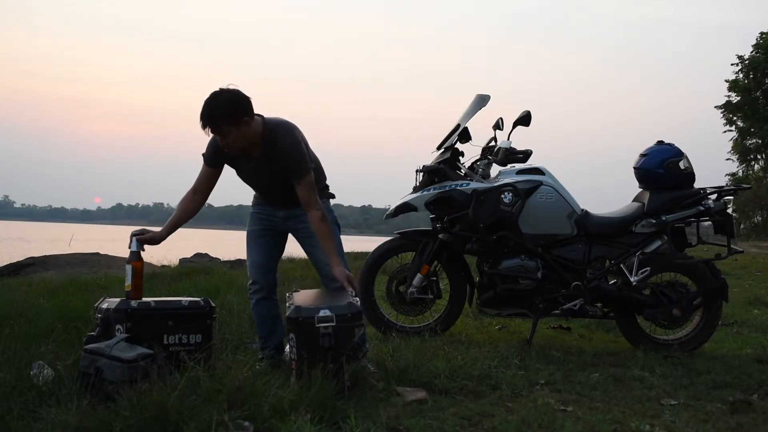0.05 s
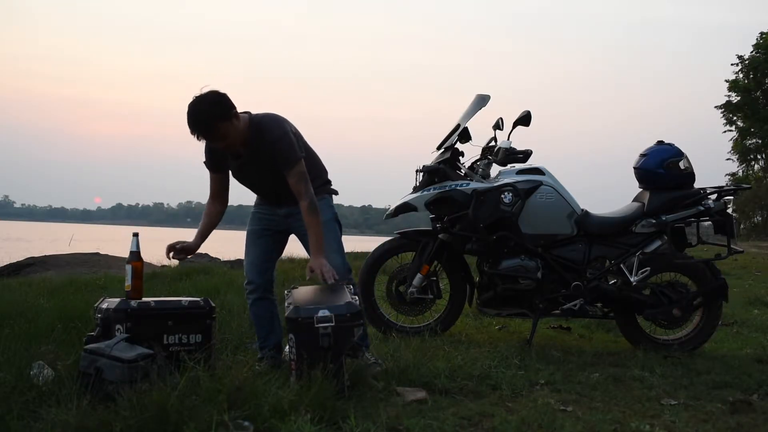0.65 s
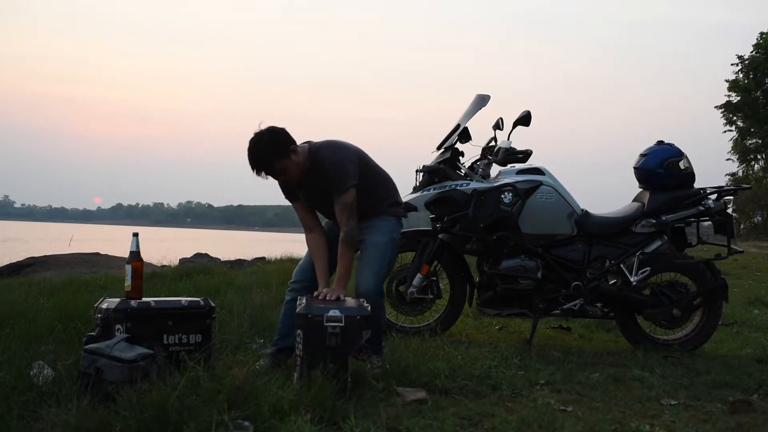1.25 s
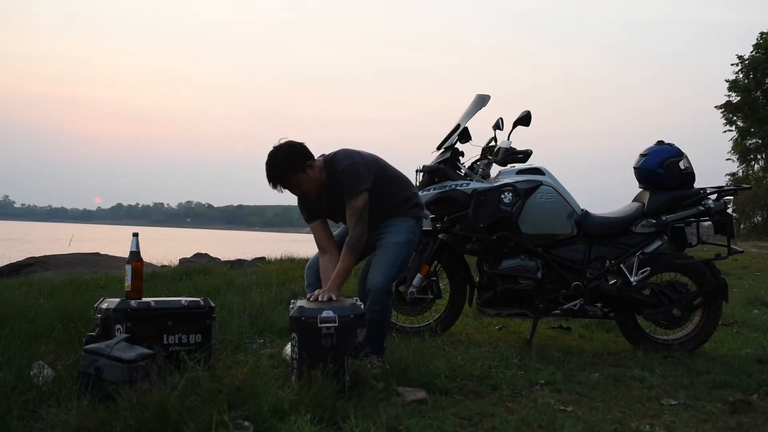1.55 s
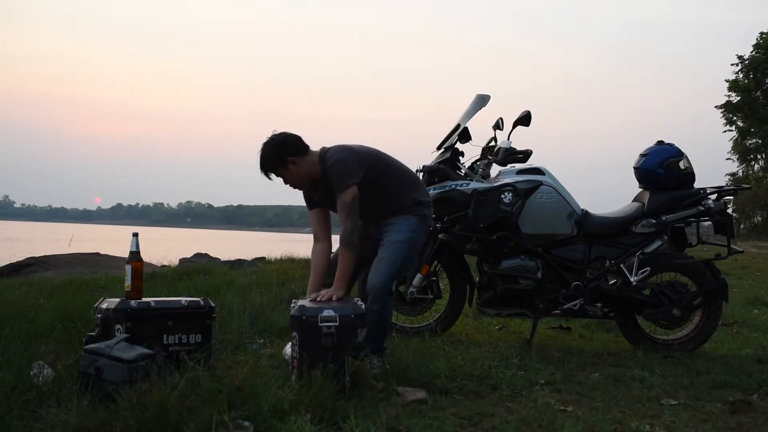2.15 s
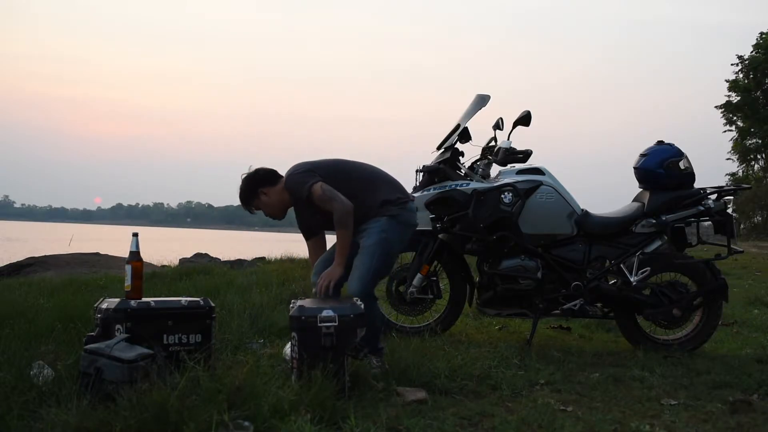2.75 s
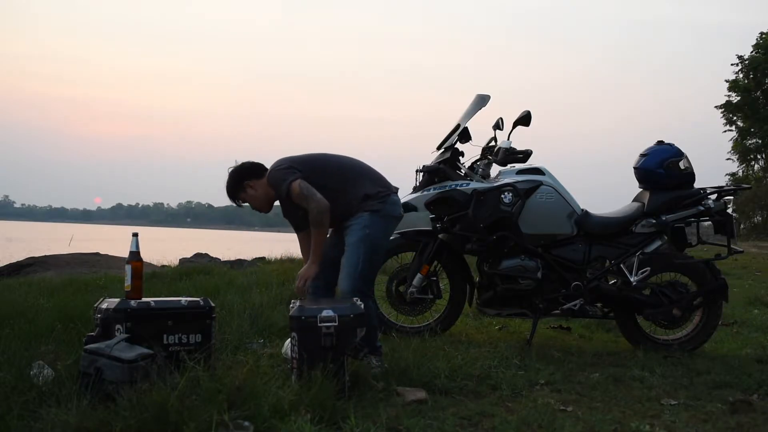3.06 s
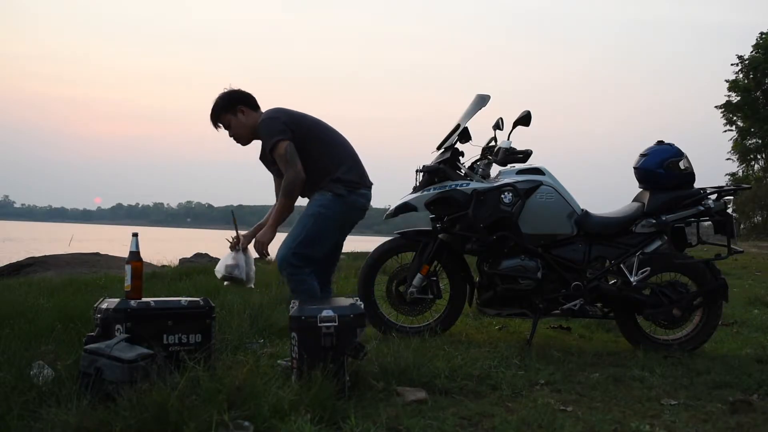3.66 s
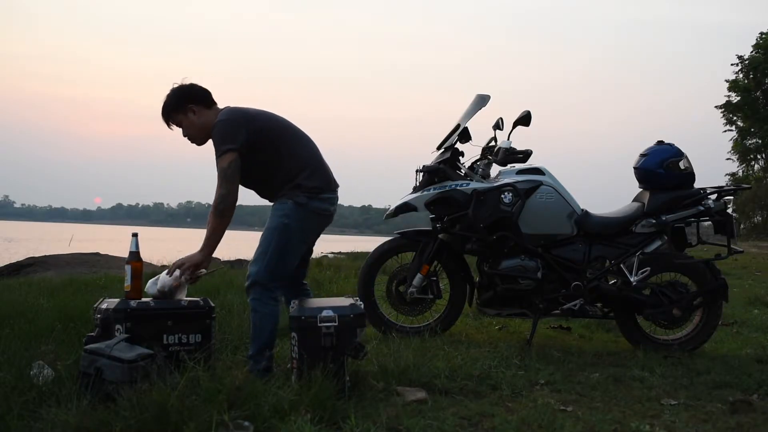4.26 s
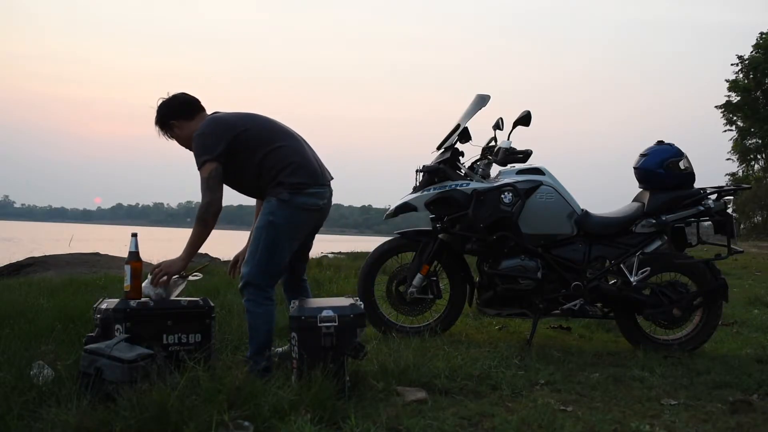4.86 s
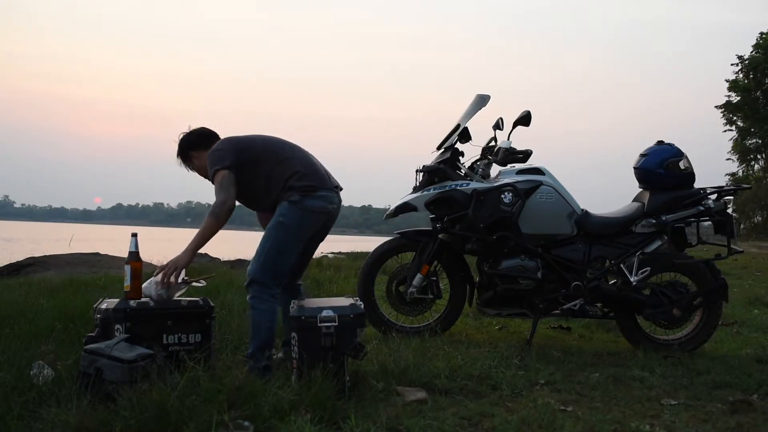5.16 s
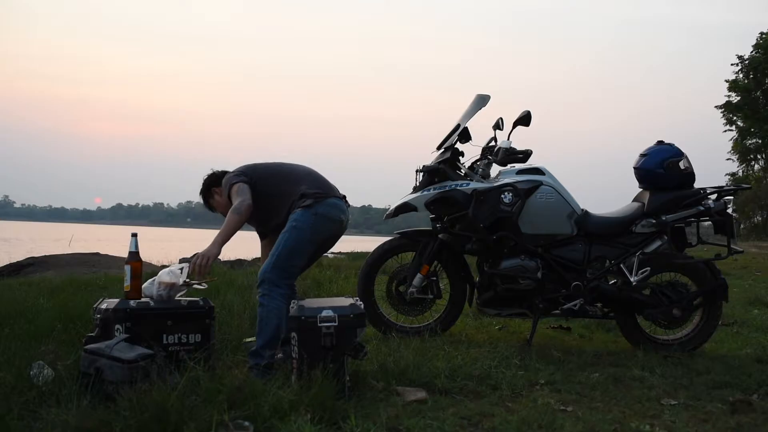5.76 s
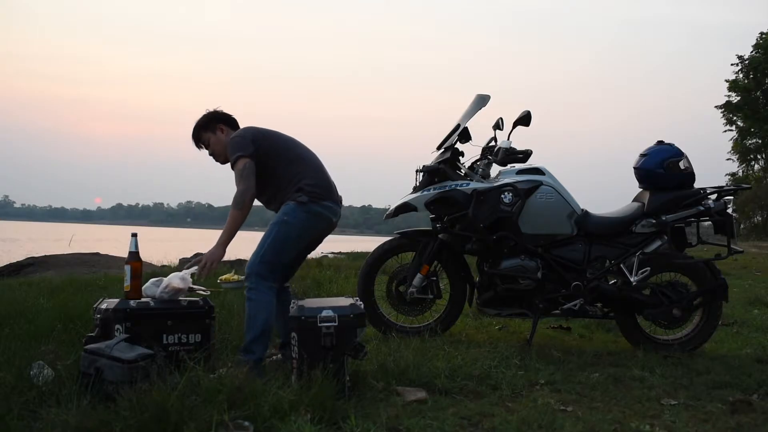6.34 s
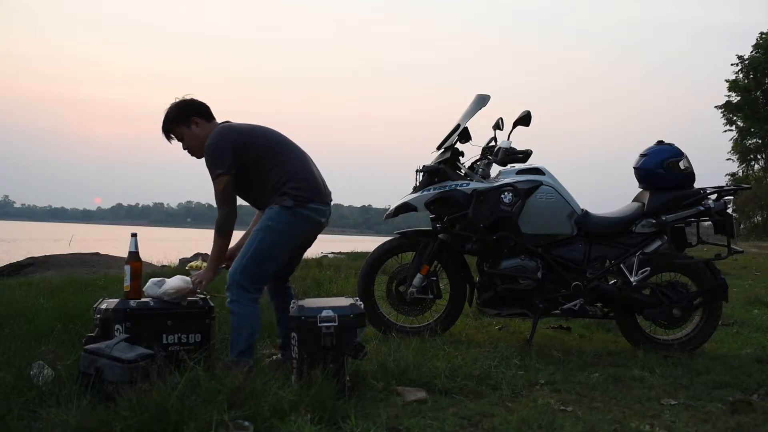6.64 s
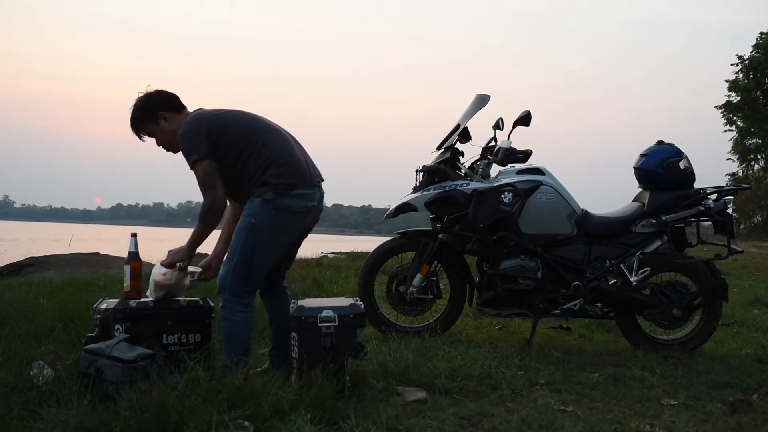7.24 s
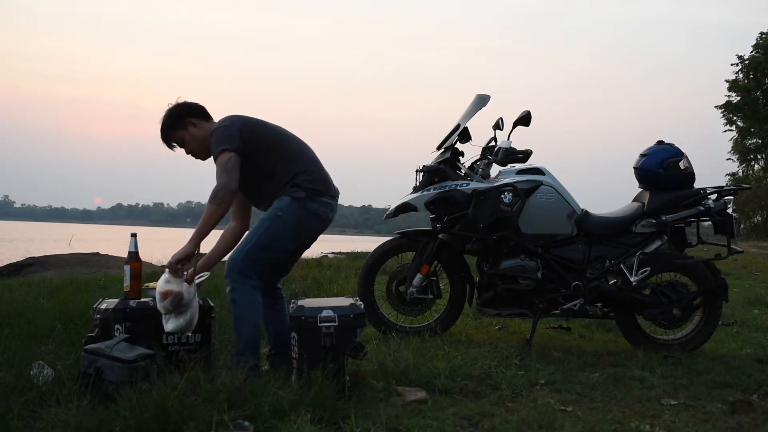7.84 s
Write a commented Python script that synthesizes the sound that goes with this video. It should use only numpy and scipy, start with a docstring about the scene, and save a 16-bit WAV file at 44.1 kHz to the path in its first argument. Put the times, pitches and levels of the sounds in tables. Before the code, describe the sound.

A steady, high buzz of crickets and an insect chorus fills a quiet outdoor place, with birds chirping throughout. In the foreground, a glass bottle knocks lightly on an aluminium case right at the start. At about 1 and 1.6 seconds come the loudest sounds, two sharp, hollow thuds of a metal case, followed by smaller knocks and clinks until 2 seconds. Feet thump softly on grass through the first six seconds. A faint, hoarse rooster crows far off from 2 to 3.5 seconds. A plastic bag rustles near 3 seconds and crinkles from 4 to 5. Bird whistles grow clearer between 4.8 and 6.3 seconds, with a quick cluster of dry taps at 5.6. The bag crinkles again from 6.5 seconds, with light bumps. A case knocks at 7.4 seconds, and metal utensils clink brightly just before 8 seconds.

```python
"""Cases and a food bag by an evening lake

A glass bottle is stood on an aluminium case and a second case is pressed into the grass: lids ring and
boxes boom. A plastic bag of food is lifted and moved, crinkling, its utensils clinking, while feet thump
softly on turf. Two bush-crickets buzz with rapid wing strokes in front of an insect chorus, birds
whistle through the trees and a hoarse rooster crows far off."""
import sys
import numpy as np
from scipy import signal
from scipy.fft import rfft, irfft, next_fast_len
from scipy.io import wavfile
from scipy.ndimage import map_coordinates

SR = 44100
rng = np.random.default_rng(int(sys.argv[2]) if len(sys.argv) > 2 else 0)


def master(y):
    """Save y as 16-bit WAV."""
    cut = np.clip(np.atleast_2d(y).T, -1, 1)
    pcm = np.round(cut * 32767)  # scale
    wavfile.write(sys.argv[1], SR, pcm.astype(np.int16))


N = 357210

# how heavily the feet shift about: (time [s], level [dB])
FOOT_WEIGHT = [(0, -42), (0.3, -53.5), (1.1, -46), (1.4, -51.5), (1.8, -38), (2.0, -48), (2.9, -50),
               (3.25, -43), (3.6, -50.5), (4.4, -57), (5.5, -53), (5.9, -57.5), (8.1, -62)]
# reverb of the trees: (frequency [Hz], t60 [s])
TREE_DECAY = [(200, 0.64), (2500, 0.86), (10000, 0.056)]


def amp(db):
    """Decibels to gain."""
    return 10 ** (np.asarray(db) / 20)


def unit(x):
    """Scaled to rms 1."""
    return x / np.sqrt(np.mean(x ** 2) + 1e-20)


def along(points, hz):
    """(frequency [Hz], value) points read on a log axis."""
    f, v = np.transpose(points)
    return np.interp(np.log(hz + 1), np.log(f + 1), v)


def curves(rows):
    """An automation curve for each column after the time."""
    s, *cols = np.transpose(rows)
    return [np.interp(np.arange(N) / SR, s, c) for c in cols]


def wobble(rate):
    """A smooth random curve, rate knots a second."""
    knots = rng.standard_normal(int(N * rate / SR) + 4)
    return map_coordinates(knots, [np.arange(N) * rate / SR])


def add(track, s, sound):
    """Mix a sound into a stereo track at time s."""
    start = max(round(s * SR), 0)
    track[:, start:start + sound.shape[-1]] += sound[..., :N - start]


def noise(spectrum, alike=None, size=N):
    """Stereo noise of rms 1, coloured by (frequency [Hz], level [dB]) points; wider in the treble."""
    # default stereo image: (frequency [Hz], left-right likeness [0-1])
    usual_alike = [(4000, 1), (8000, 0.58), (13000, 0.55)]
    hz = np.fft.rfftfreq(size, 1 / SR)
    width = np.arccos(np.clip(along(alike or usual_alike, hz), -1, 1)) / 2
    coloured = rfft(rng.standard_normal((2, size))) * amp(along(spectrum, hz))
    mid, side = irfft(coloured * [np.cos(width), np.sin(width)], size)
    return unit(np.array([mid + side, mid - side]))


def place(x, left_db, lead_ms):
    """Pan: the left side leads, and is left_db louder at 10 kHz as the right's treble is shaded."""
    side, size = np.array([[.5], [-.5]]), x.shape[-1]
    hz = np.fft.rfftfreq(size, 1 / SR)
    arrival = np.exp(2j * np.pi * hz * side * lead_ms / 1000)
    shade = amp(side * left_db * hz / 10000)
    return irfft(rfft(x) * arrival * shade, size)


def ring(modes, t, detune=.006):
    """Decaying modes, one a row; every blow shares its force among them anew."""
    hz, db, t60 = np.transpose(modes)[:, :, None]
    gain = amp(db + 1.5 * rng.standard_normal(hz.shape))
    gain /= np.sqrt(np.sum(gain ** 2) / 2)
    sign = (-1) ** np.arange(len(hz))[:, None]
    hz = hz * (1 + detune * rng.standard_normal(hz.shape))
    return sign * gain * amp(-60 * t / t60) * np.sin(2 * np.pi * hz * t)


def evening_air():
    """The bed: a swelling haze of distant birds over the open air."""
    # colour of the air: (frequency [Hz], level [dB])
    air_colour = [(120, -39), (200, -0.5), (475, -19.5), (614, -6), (954, -10.5), (1180, -13.5),
                  (1890, -21), (2560, -1), (3360, -11), (3790, -15), (4620, 0.5), (5210, -16.5),
                  (5710, 3.5), (7500, -4), (9750, -54), (16500, -120)]
    haze_colour = [(1000, -60), (1500, -17), (2300, 0), (2800, -7.5), (3400, 5.5), (4200, -28),
                   (6000, -60)]
    haze = amp(-60 + 1.8 * wobble(7)) * noise(haze_colour)
    air = amp(-53.7 + 0.9 * wobble(4.16)) * noise(air_colour)
    return haze + air


def buzz(rate_hz, start_hz, end_hz, stroke_s, scatter, unsteady):
    """Each wing stroke is a falling chirp, at a slightly unsteady rate; grass adds a short tail."""
    t = np.arange(SR // 40) / SR
    u = np.minimum(t / stroke_s, 1)
    chirp = np.sin(np.pi * u) ** 2 * np.sin(2 * np.pi * t * (start_hz + (end_hz - start_hz) * u / 2))
    beats = np.floor(np.cumsum(rate_hz * (1 + unsteady * wobble(70))) / SR)
    strokes = np.diff(beats, prepend=0) * amp(wobble(60))
    grass = scatter * rng.standard_normal((2, len(t))) / np.sqrt(len(t))
    grass[:, 0] = 1  # the direct path
    voice = signal.fftconvolve(chirp[None], grass, axes=1)
    return unit(signal.fftconvolve(strokes[None], voice, axes=1)[:, :N])


def insects():
    """Two near bush-crickets in front of a blurred chorus and a broad background hiss."""
    # the crickets' faders: (time [s], low singer [dB], high singer [dB])
    cricket_levels = [(0, -51.5, -49.5), (0.7, -49, -48.5), (2, -51, -49.5), (3.1, -51.5, -48.5),
                      (3.9, -54, -51), (4.5, -72.5, -48), (5.4, -56.5, -51), (6.2, -64, -51),
                      (7.2, -71, -52), (7.5, -76, -54), (8.1, -72, -54)]
    # insect chorus over a broad, even background hiss: (frequency [Hz], level [dB])
    chorus_and_hiss = [(4000, -10), (5000, -3.5), (5700, 0), (6400, -19), (7400, -18), (8200, -2.5),
                       (9000, 9), (9500, 5), (10200, -6), (11200, -36), (12000, -10), (13000, -42),
                       (16000, -58)]
    # stereo image of that bed: (frequency [Hz], left-right likeness [0-1])
    bed_alike = [(6000, 1), (9000, 0.65), (12000, 0.25)]
    low_db, high_db = curves(cricket_levels)
    low = buzz(rate_hz=107.2, start_hz=9160, end_hz=8080, stroke_s=.0041, scatter=.056, unsteady=.0023)
    high = buzz(rate_hz=131.2, start_hz=12350, end_hz=9400, stroke_s=.0069, scatter=.8, unsteady=.0076)
    bed = amp(-47 + 0.44 * wobble(3.3)) * noise(chorus_and_hiss, alike=bed_alike)
    ahead = place(amp(low_db + 3.5) * low + bed, left_db=1, lead_ms=0)
    return ahead + place(amp(high_db - 1) * high, left_db=7, lead_ms=.075)


def shuffles(count):
    """Small random shifts of weight, heavier while the feet are busy, as footfall rows."""
    when, pitch, size = rng.random((count, 3)).T
    s = when * N / SR
    db = np.interp(s, *np.transpose(FOOT_WEIGHT)) + 12 + 2 * size
    hz = 121 * 2 ** (pitch - .5)
    return list(zip(s, db, hz))


def steps():
    """Turf takes each footfall as a dull push of a cycle or two, over an uneven low rumble."""
    # firm footfalls: (time [s], level [dB], pitch [Hz])
    footfalls = [(0.592, -34.5, 81), (0.652, -34.5, 78), (0.695, -31.5, 146), (0.83, -37.5, 90),
                 (0.903, -27.5, 107), (1.159, -34, 115), (1.207, -37, 94.5), (1.275, -33.5, 107),
                 (2.463, -32, 89), (3.046, -33, 87), (3.272, -29.5, 182), (3.296, -32.5, 101),
                 (3.359, -33, 75), (3.858, -34.5, 82), (4.198, -37.5, 75), (4.731, -39.5, 88.5),
                 (4.783, -36, 106), (5.544, -31, 117), (5.689, -37.5, 86), (5.759, -40, 125)]
    # colour of the ground rumble: (frequency [Hz], level [dB])
    rumble_colour = [(12, -45), (20, -4), (86, -1.5), (135, -5.5), (252, -23), (284, -17.5), (362, -20.5),
                     (500, -23), (650, -18), (1100, -120)]
    scuff_colour = [(15, -38), (40, -14), (90, -2.5), (220, -6), (500, -41), (3000, -37)]
    out, t = np.zeros((2, N)), np.arange(SR // 4) / SR
    for s, db, hz in footfalls + shuffles(count=26):
        half_cycles = 2 * t * hz
        push = half_cycles * np.exp(1 - half_cycles) * np.sin(2 * np.pi * hz * t)
        scuff = amp(-6.5 - 60 * t / 0.17) * noise(scuff_colour, size=len(t))
        add(out, s, amp(db - 1) * (push + scuff * (1 - np.exp(-t / 0.0065))))
    ground_db, = curves(FOOT_WEIGHT)
    return out + amp(ground_db - 2.5 + 1.8 * wobble(14)) * noise(rumble_colour)


def handling():
    """Rustle and crinkle envelopes: each stroke swells, holds and fades above the held bag's stir."""
    # light rustle of the bag as it hangs or is held: (time [s], level [dB])
    held = [(0, -69), (2.6, -67.5), (3.5, -63.5), (4.3, -59.5), (5.0, -60.5), (5.35, -65.5), (5.95, -67),
            (6.45, -57.5), (7.05, -58), (7.45, -59.5), (8.1, -73)]
    # hands over grass, cloth and plastic:
    # (time [s], hold [s], rustle [dB], relative crinkle [dB], swell [s], fade [s])
    rubs = [(1.37, 0.1, -57, -11, 0.058, 0.04), (2.79, .04, -56, 1.5, .03, 0.043),
            (2.896, 0.027, -48.5, -0.5, 0.054, 0.11), (3.139, 0.028, -57.5, 7, 0.11, 0.0078),
            (4.12, 0.016, -47, 2, 0.022, 0.072), (4.46, 0.13, -56.5, 7.5, 0.044, 0.095),
            (4.785, 0.073, -54.5, 6, 0.062, 0.025), (4.906, 0.033, -57.5, 5.5, 0.023, 0.018),
            (6.485, 0.031, -48, -1.5, 0.038, 0.024), (6.693, 0.03, -54.5, 2.5, 0.013, 0.025),
            (6.749, 0.053, -54.5, 4.5, 0.019, 0.025), (6.858, 0.026, -56, 4.5, .02, 0.064),
            (7.088, 0.023, -51.5, 4.5, 0.017, 0.023), (7.178, 0.086, -52, 4.5, 0.037, 0.026),
            (7.664, 0.027, -51.5, -1.5, 0.07, 0.067), (7.8, 0.12, -49.5, 3, 0.026, 0.049),
            (8.069, .05, -53, -1, 0.025, .047)]
    # sharp creases snapping in the plastic: (time [s], level [dB])
    creases = [(4.556, -48), (4.603, -46), (6.478, -36), (6.522, -77), (6.622, -42), (6.764, -47),
               (6.778, -47), (6.799, -43), (6.885, -49), (6.92, -49), (7.09, -45), (7.257, -39)]
    t = np.arange(N) / SR
    held_db, = curves(held)
    rustle_power = amp(held_db) ** 2
    crinkle_power = amp(-73 + 3.03 * (held_db - held_db.mean())) ** 2  # swings wider than the rustle
    for s, hold_s, db, crinkle_db, swell_s, fade_s in rubs:
        stroke = np.exp(-np.maximum(s - t, 0) / swell_s - np.maximum(t - s - hold_s, 0) / fade_s)
        rustle_power += (amp(db) * stroke) ** 2
        crinkle_power += (amp(db + crinkle_db) * stroke) ** 2
    for s, db in creases:
        crinkle_power += (amp(db) * (t >= s) * np.exp(-abs(t - s) / .003)) ** 2
    return np.sqrt(rustle_power), np.sqrt(crinkle_power)


def bag():
    """Cloth and plastic rub, and the thin bag crinkles: tiny snaps in uneven clumps as hands move."""
    # colours of the rubbing and of the crinkling plastic: (frequency [Hz], level [dB])
    rustle_colour = [(150, -1), (400, -5), (900, -2), (1700, 5.5), (2600, -14), (4500, -27), (8000, 5),
                     (16000, -40)]
    plastic_colour = [(1000, -11), (2500, 0.5), (4500, 6), (7000, 5.5), (10000, 6.5), (13500, 1.5),
                      (16000, -10.5)]
    rustle, crinkle = handling()
    snaps = (rng.random(N) < 420 / SR) * amp(4.8 * rng.exponential(size=N).clip(0, 3))
    grains = unit(signal.lfilter([1], [1, -np.exp(-1 / (0.002 * SR))], snaps))  # 2 ms tails
    clumps = amp(.9 * wobble(45))
    rubbing = amp(5.5) * rustle * unit((1.8 + grains) * clumps) * noise(rustle_colour)
    snapping = amp(11) * crinkle * unit((.9 + grains) * clumps) * noise(plastic_colour)
    return place(rubbing + snapping, left_db=3.5, lead_ms=.068)


def case_at(s):
    """Box and lid modes of the case being handled at time s: the middle one or the left one."""
    # boxy modes of each case: (frequency [Hz], level [dB], t60 [s])
    left_box = [(76.6, 0, 0.27), (146.3, 4, 0.27), (200.3, -2, 0.286), (236.7, 1, 0.16), (321.3, -2.5, .22),
                (426, -3, 0.085), (481, -3, 0.11), (589, -9, .2), (730, -3, 0.16)]
    middle_box = [(79.6, 5, 0.34), (106, -7.5, 0.2), (145, 5, 0.23), (173.4, 1.5, .24), (249, -4.5, 0.31),
                  (270.8, -3, 0.25), (328, -2.5, 0.14), (431, 1.5, 0.15), (537, -4, 0.23), (636, -9, .16),
                  (730, 0, 0.078), (834, 0.5, 0.097), (893, -2, .1)]
    # stiff modes of each lid and rim: (frequency [Hz], level [dB], t60 [s])
    left_lid = [(891, -11, 0.085), (1086, -7.5, 0.061), (1257, 3, 0.048), (1360, -3, 0.064),
                (1528, 4, 0.028), (1800, 0.5, 0.025), (1900, 3, 0.028), (2117, -2, 0.063),
                (2260, -2.5, 0.056), (2880, -8, 0.024)]
    middle_lid = [(1088, -11, .08), (1253, -5.5, 0.056), (1407, -14.5, 0.098), (1605, -9, 0.073),
                  (1764, 2.5, 0.03), (1898, 9.5, 0.012), (2100, -10, 0.065), (2596, -9.5, 0.044),
                  (2950, 0, 0.018), (3170, -11, 0.053), (3850, -17, 0.043)]
    return (middle_box, middle_lid) if 0.95 < s < 4 else (left_box, left_lid)


def knocks():
    """The lid rings under a crack, both duller for a softer touch, with a tick and a hollow clap."""
    # hard contacts: (time [s], level [dB], relative tick [dB], relative clap [dB], low-pass [Hz])
    hits = [(0.0171, -18.5, 4, -1, 2820), (0.057, -16.5, -2, -5, 2620), (0.976, -3.5, -3.5, -14, 7000),
            (1.001, -12, 2, -6.5, 5000), (1.5548, -6.5, -8, -6, 2600), (1.5605, -1.5, 1.5, -27, 6000),
            (1.638, -30.5, -10, 1, 1800), (1.782, -24, -10, -0.5, 2200), (1.8835, -15.5, 6.5, 1.5, 5000),
            (1.9117, -20.5, 10, -8, 5000), (6.711, -27, -11, -24, 3000), (7.4283, -16, 3, -9, 4800),
            (7.477, -32, -8, -7, 2000), (7.872, -27, -7, -14, 3500), (7.879, -23.5, -7, -18, 3000),
            (7.902, -34, -7, -20, 3000)]
    # where the hands work, left case to middle and back: (time [s], left lead [ms])
    hand_position = [(0, 0.038), (1.55, 0.022), (4.1, .06)]
    # colours of the crack and the bright tick: (frequency [Hz], level [dB])
    crack_colour = [(300, -32), (900, -1.5), (2000, 3.5), (3500, 2), (5000, -4), (15000, -33)]
    tick_colour = [(2500, -5), (4500, -2), (7000, 3), (9500, 10), (11000, -11), (16000, -34)]
    clap_colour = [(30, -53), (150, 9.5), (450, -7.5), (850, 6.5), (1800, -12)]
    out, t = np.zeros((2, N)), np.arange(SR // 4) / SR
    attack = 1 - np.exp(-t * SR / 20)
    for s, db, tick_db, clap_db, hard_hz in hits:
        _, lid_modes = case_at(s)
        lid = amp(-5.5) * ring(lid_modes, t).sum(0)
        crack = amp(-14 - 60 * t / 0.036) * noise(crack_colour, size=len(t))
        contact = signal.sosfilt(signal.butter(2, hard_hz, fs=SR, output="sos"), lid + crack)
        tick = amp(tick_db - 12.5 - 60 * t / 0.027) * noise(tick_colour, size=len(t))
        clap = amp(clap_db - 8.5 - 60 * t / 0.09) * noise(clap_colour, size=len(t))
        lead_ms = np.interp(s, *np.transpose(hand_position))
        add(out, s, place(amp(db) * (contact + tick + clap) * attack, left_db=-1.5, lead_ms=lead_ms))
    return out


def thuds():
    """The box booms, low for a soft landing and high for a stiff spot, and its load shudders."""
    # weight landing on a case:
    # (time [s], level [dB], upper corner [Hz], lower corner [Hz], damping by hand and load [dB/s])
    landings = [(0.019, -22, 403, 115, 18), (0.037, -18.5, 229, 70, 10), (0.059, -22.5, 600, 115, 8),
                (0.982, -18, 400, 150, 100), (0.9916, -4.5, 302, 113, 132), (1.003, -6.5, 450, 290, 130),
                (1.105, -26.5, 550, 280, 100), (1.557, -11.5, 240, 81, 110), (1.569, -11, 950, 460, 128),
                (1.636, -31, 600, 170, 150), (1.668, -27.5, 590, 200, 200), (1.844, -24, 500, 70, 98),
                (1.887, -19, 450, 60, 46), (4.136, -32.5, 260, 140, 144), (6.519, -32.5, 380, 290, 105),
                (6.712, -28.5, 310, 230, 96), (6.8, -40, 310, 230, 95), (7.428, -15.5, 425, 225, 175),
                (7.434, -24, 130, 70, 150), (7.477, -31, 555, 280, 150), (7.611, -30, 336, 280, 151),
                (7.737, -34, 380, 290, 300)]
    load_colour = [(20, -45), (60, -19), (140, -6), (450, -5.5), (700, -22.5), (2000, -24.5), (6000, -70)]
    out, t = np.zeros((2, N)), np.arange(SR // 2) / SR
    attack = 1 - np.exp(-t / .001)
    for s, db, soft_hz, low_hz, damping in landings:
        modes, _ = case_at(s)
        mode_hz = np.array(modes)[:, :1]
        reach = 1 / np.sqrt((1 + (mode_hz / soft_hz) ** 6) * (1 + (low_hz / mode_hz) ** 6))
        direction = rng.choice([-1, 1], mode_hz.shape)  # the spot pushes each mode in or out
        box = (ring(modes, t) * reach * direction).sum(0) * amp(-1.5 - damping * t)
        shudder = amp(-25 - 60 * t / 0.36) * noise(load_colour, size=len(t))
        add(out, s, amp(db) * (box + shudder) * attack)
    # the thuds carry almost nothing below about 60 Hz
    return signal.sosfilt(signal.butter(3, 62, "highpass", fs=SR, output="sos"), out)


def sing(notes, overtone_db, waver, flutter_db):
    """Each note glides through three pitches, with an octave and a quaver; it weakens as it sinks."""
    out, quaver, flutter = np.zeros((2, N)), wobble(130), wobble(70)
    for s, length, start_hz, middle_hz, end_hz, db in notes:
        u = np.linspace(0, 1, max(round(length * SR), 2))
        span = round(s * SR) + np.arange(len(u))
        glide = np.polyval(np.polyfit([0, .5, 1], [start_hz, middle_hz, end_hz], 2), u)
        phase = 2 * np.pi * np.cumsum(glide * (1 + waver * quaver[span])) / SR
        octaves_sunk = np.maximum(np.log2(start_hz / glide), 0)
        level = amp(db + flutter_db * flutter[span] - 11 * octaves_sunk)
        tone = np.sin(phase) + amp(overtone_db) * np.sin(2 * phase)
        add(out, s, level * np.abs(np.sin(np.pi * u)) ** .5 * tone)
    return out


def among_trees(x, decay):
    """Trunks and leaves scatter a call into a tail; decay is (frequency [Hz], t60 [s])."""
    hz, t, bands = signal.stft(noise([(100, 0), (10000, 0)], size=SR), SR, nperseg=256)
    tail = signal.istft(bands * amp(-60 * t / along(decay, hz)[:, None]), SR, nperseg=256)[1]
    return signal.fftconvolve(x, tail / np.linalg.norm(tail[0]), axes=1)[:, :N]


def chatter(count, hz, db):
    """Short chirps of farther birds at random moments, as notes for sing."""
    when, duration = rng.random((2, count))
    pitch, bend, slope, size = rng.standard_normal((4, count))
    s, length = when * (N / SR - .2), 0.029 + 0.0445 * duration
    middle = hz * np.exp(.16 * pitch)
    start, end = middle * (1 + 0.075 * bend), middle * (1 + 0.062 * slope)
    return np.transpose([s, length, start, middle, end, db + 2 * size])


def birds():
    """Calls arrive partly straight, partly through leaves; fainter birds are scattered more."""
    # bird whistles and chirps, plus one faint note of the far rooster near 1500 Hz:
    # (time [s], length [s], start [Hz], end [Hz], level [dB])
    calls = [(0.07, 0.053, 2890, 2750, -48.5), (0.166, 0.075, 1520, 1420, -56),
             (0.589, 0.033, 2980, 3080, -59), (0.618, 0.056, 2830, 2820, -52.5),
             (0.749, 0.027, 3230, 3320, -50.5), (1.171, 0.025, 3130, 3280, -52),
             (1.249, 0.034, 2850, 3350, -50), (1.284, 0.08, 3260, 2810, -53),
             (1.335, 0.11, 4200, 4050, -54), (1.635, 0.052, 2230, 2190, -51),
             (1.706, 0.065, 3025, 2440, -48), (1.766, 0.09, 2486, 2730, -41),
             (1.923, 0.071, 3830, 3660, -53), (1.991, 0.026, 2950, 3100, -47),
             (2.058, 0.031, 3670, 3570, -53), (2.13, 0.088, 3950, 4350, -55.5),
             (2.205, 0.026, 2730, 3100, -51), (2.48, 0.038, 3240, 2890, -57), (2.5, .05, 2400, 2245, -53),
             (2.694, 0.029, 2840, 3090, -50), (2.966, 0.029, 2370, 2400, -46.5),
             (3.002, 0.067, 3440, 3600, -55), (3.327, 0.038, 2240, 2290, -58),
             (3.403, 0.039, 3030, 2830, -54), (3.479, 0.125, 2710, 2550, -59),
             (3.695, 0.026, 3024, 3130, -55), (3.758, 0.043, 3950, 3800, -54),
             (3.8, 0.043, 2650, 2450, -59), (4.797, 0.039, 2740, 2350, -44.5),
             (4.844, 0.055, 2434, 2610, -40.5), (4.89, 0.049, 2615, 2610, -45.5),
             (5.177, 0.033, 2590, 2200, -42), (5.222, 0.056, 2970, 2830, -47.5),
             (5.353, 0.073, 2568, 2647, -35), (5.411, 0.029, 2350, 2100, -41),
             (5.439, 0.07, 2504, 2290, -43), (5.472, 0.11, 2430, 1600, -38.5),
             (5.84, 0.15, 2530, 2507, -47.5), (6.061, 0.092, 2616, 2936, -47.5),
             (6.14, 0.11, 2560, 1900, -48), (6.27, 0.13, 2580, 2390, -55),
             (7.406, 0.071, 2450, 2130, -48.5), (7.522, .11, 2300, 1926, -54)]
    # short reverb of the leaves: (frequency [Hz], t60 [s])
    leaf_decay = [(200, .2), (3000, .17), (10000, .1)]
    direct, scattered, echoing = [], [], []
    for s, length, start, end, db in calls:
        middle = 1.0194 * (start + end) / 2  # the pitch bows upward in mid-note
        note = (s, length, start, middle, end)
        leaf_share = np.interp(db, [-54, -36], [.25, .08])
        direct.append((*note, db + 10 * np.log10(1 - leaf_share)))
        scattered.append((*note, db + 10 * np.log10(leaf_share)))
        echoing.append((*note, db - 8.5))
    straight = sing(direct, overtone_db=-32, waver=0.012, flutter_db=1.8)
    leafy = among_trees(sing(scattered, overtone_db=-30, waver=0.03, flutter_db=3), leaf_decay)
    echo = sing(echoing, overtone_db=-20, waver=0.04, flutter_db=3)
    far_birds = sing(chatter(count=130, hz=2900, db=-63.5), overtone_db=-30, waver=0.025, flutter_db=2)
    return amp(3.5) * (straight + leafy) + among_trees(echo + far_birds, TREE_DECAY)


def far_calls():
    """Falling calls that arrive by so many paths that only a sliding band is left."""
    # calls from deep in the trees: (time [s], length [s], start [Hz], end [Hz], level [dB])
    calls = [(0.111, 0.24, 2620, 2350, -48), (0.3, 0.19, 2450, 2240, -54.5), (5.19, 0.14, 2400, 2200, -55),
             (5.453, 0.16, 2445, 2150, -50), (5.655, 0.22, 2850, 2600, -53.5),
             (5.865, 0.23, 2330, 2140, -50), (6.152, 0.14, 2500, 2150, -51.5)]
    out = np.zeros((2, N))
    paths = wobble(520) + 1j * wobble(520)  # the paths beat against each other
    for s, length, start_hz, end_hz, db in calls:
        u = np.linspace(0, 1, round(length * SR))
        call = np.exp(2j * np.pi * np.cumsum(start_hz + (end_hz - start_hz) * u) / SR)
        smeared = (call * paths[round(s * SR):][:len(u)]).real
        add(out, s, amp(db) * np.abs(np.sin(np.pi * u)) ** .5 * smeared)
    return out


def bumps():
    """A hand or the bag nudges one panel of a case, which gives a small round note."""
    # soft touches: (time [s], level [dB], pitch [Hz], t60 [s])
    touches = [(0.325, -34, 185, 0.15), (0.503, -35, 181, 0.11), (0.869, -19, 181, 0.096),
               (0.914, -32.5, 194, 0.13), (4.1, -34, 173, 0.17)]
    out, t = np.zeros((2, N)), np.arange(SR // 3) / SR
    soft_attack = 1 - np.exp(-(t / .006) ** 2)
    for s, db, hz, t60 in touches:
        add(out, s, amp(db - 60 * t / t60) * np.sin(2 * np.pi * hz * t) * soft_attack)
    return out


def clinks():
    """Small metal parts touch: a short scrape and a sharp snap, then thin high modes ring on."""
    # utensils and fittings:
    # (time [s], level [dB], relative treble [dB], decay scale [s], relative contact noise [dB])
    touches = [(1.744, -27.5, 4.5, 0.018, 2.5), (1.751, -32, 6, 0.04, 4), (1.767, -35, 0, 0.041, 7),
               (7.401, -35, -2, 0.08, 5), (7.7375, -21, -11, 0.16, -4), (7.8708, -22.5, 9, 0.084, 0),
               (7.8787, -24, 11.5, 0.08, 1), (7.901, -26.5, 8, 0.11, -1.5), (7.921, -35.5, 3, 0.26, -3)]
    # a utensil's modes, and its highest, reached by sharp contacts: (frequency [Hz], level [dB], t60 [s])
    body_modes = [(1518, -16, 0.084), (2000, -1, 0.044), (2620, -7, 0.13), (3345, 0, 0.099),
                  (3650, -1, 0.28), (3680, -4, 0.21), (4170, 8, 0.041), (4400, -1, .2), (4850, 1.5, 0.11),
                  (5150, -1, 0.083), (6056, 0, 0.15), (7170, 2, .22)]
    tine_modes = [(6627, 1, .2), (7445, -6, .2), (7897, 11, 0.25), (8660, -3.5, 0.14), (9878, 6, .2),
                  (10800, 0.5, .21), (12000, -4, 0.12), (13600, -4.5, .15), (14842, -18, .14)]
    # colours of the scrape and the snap: (frequency [Hz], level [dB])
    scrape_colour = [(300, 0), (800, -11), (1600, 13), (2400, -2), (3800, 7), (7000, 2), (15000, -65)]
    snap_colour = [(3000, -16), (6000, -12), (9000, 7), (11000, -10), (14000, -18), (16000, -26)]
    out, t = np.zeros((2, N)), np.arange(SR // 4) / SR
    for s, db, treble_db, decay_s, contact_db in touches:
        body = ring(body_modes, t, detune=.001).sum(0)
        tines = amp(treble_db - 2.5) * ring(tine_modes, t, detune=.001).sum(0)
        grip = amp(-4 - 12 * t / decay_s) * (decay_s / .1)  # a firmly held part rings less
        scrape = amp(-7) * noise(scrape_colour, size=len(t))
        snap = amp(treble_db - 6) * noise(snap_colour, size=len(t))
        contact = amp(contact_db - 75 * t / decay_s) * (scrape + snap)
        add(out, s, amp(db) * (grip * (body + tines) + contact))
    return place(out, left_db=3, lead_ms=.06)


def rooster():
    """A hoarse far crow with a strong octave, echoing in the trees."""
    # the crow: (time [s], length [s], start [Hz], middle [Hz], end [Hz], level [dB])
    syllables = [(2.1, 0.14, 619, 640, 648, -59), (2.335, 0.14, 659, 763, 725, -53),
                 (2.53, 0.11, 633, 720, 740, -53.5), (2.6, 0.34, 739, 731, 731, -52.5),
                 (2.94, 0.338, 700, 679, 671, -57.5), (3.33, .27, 705, 702, 680, -62)]
    crow = amp(-1.5) * sing(syllables, overtone_db=-3.5, waver=.008, flutter_db=2.4)
    return crow + among_trees(amp(-6) * crow, TREE_DECAY)


def clicks():
    """Light things from the bag are laid down: a soft-edged tap with a very short ring."""
    # dry taps: (time [s], level [dB])
    taps = [(5.587, -31), (5.594, -26), (5.609, -33), (5.6202, -22.5), (5.6235, -25.5)]
    # what those things ring with: (frequency [Hz], level [dB], t60 [s])
    modes = [(2810, -6, .07), (3810, -1, .05), (4390, -5, .05), (5750, -4, .05), (6690, 0, .07),
             (7330, 1, .07), (8180, -1, .04), (9070, -2, 0.055), (13300, -8, .04), (15000, -11, .04)]
    tap_colour = [(150, -14), (600, 1.5), (1300, -7), (6500, 1.5), (11000, 0.5), (16000, -8)]
    out, t = np.zeros((2, N)), np.arange(SR // 8) / SR
    attack = 1 - np.exp(-t / .0008)
    for s, db in taps:
        tap = amp(-2.5 - 60 * t / 0.043) * noise(tap_colour, size=len(t))
        ping = amp(-8) * ring(modes, t, detune=.002).sum(0)
        add(out, s, amp(db) * (ping + tap) * attack)
    return place(out, left_db=0, lead_ms=.03)


def scene():
    """The handling in front, the evening around it."""
    foreground = knocks() + thuds() + bumps() + clinks() + clicks() + steps() + bag()
    return foreground + insects() + birds() + far_calls() + rooster() + evening_air()


def record(dry):
    """A brick-wall low-pass takes off the very top."""
    size = next_fast_len(N + SR // 2)
    passband = np.fft.rfftfreq(size, 1 / SR) < 15900
    return irfft(rfft(dry, size) * passband, size)[:, :N]


dry = scene()
out = record(dry)
master(out)
```